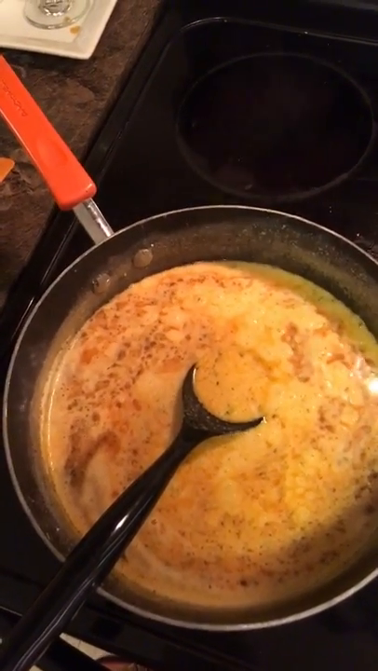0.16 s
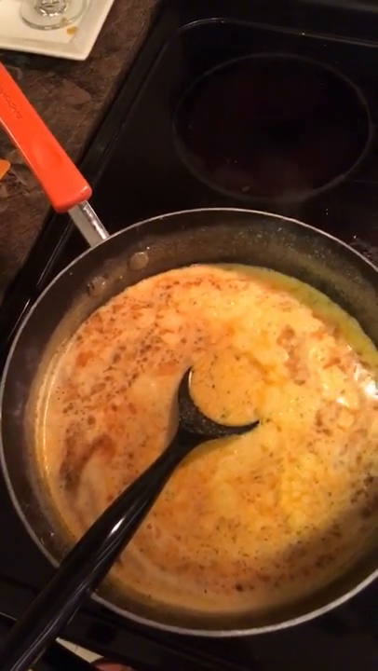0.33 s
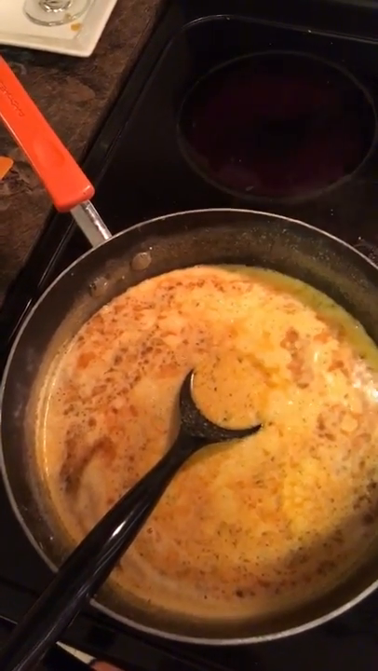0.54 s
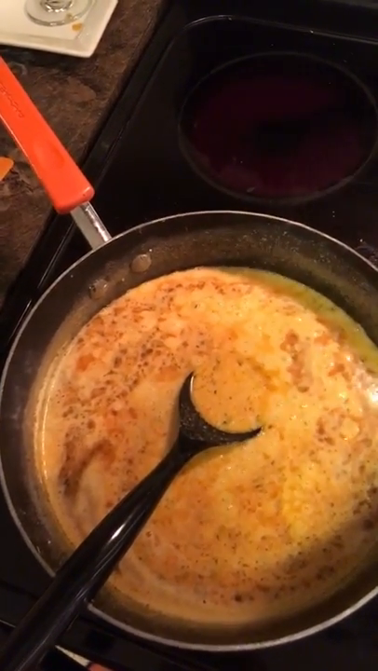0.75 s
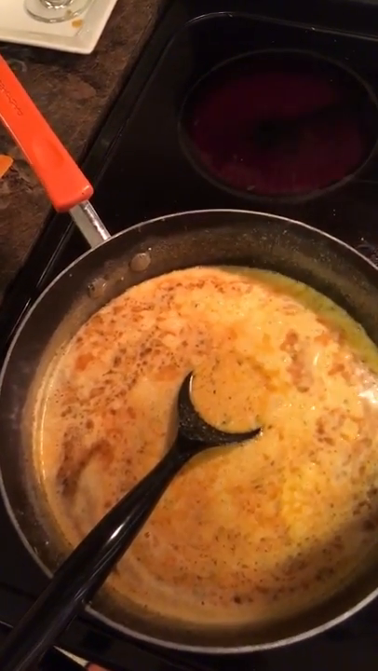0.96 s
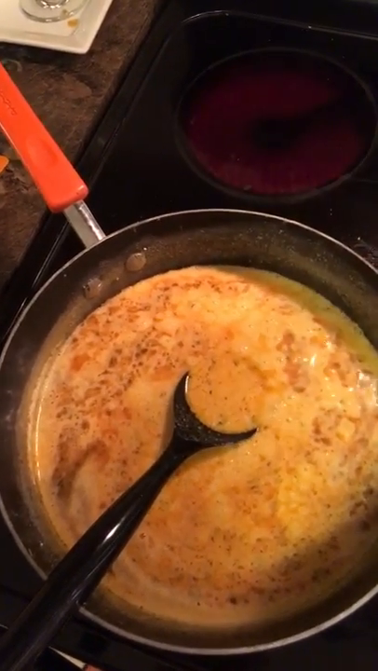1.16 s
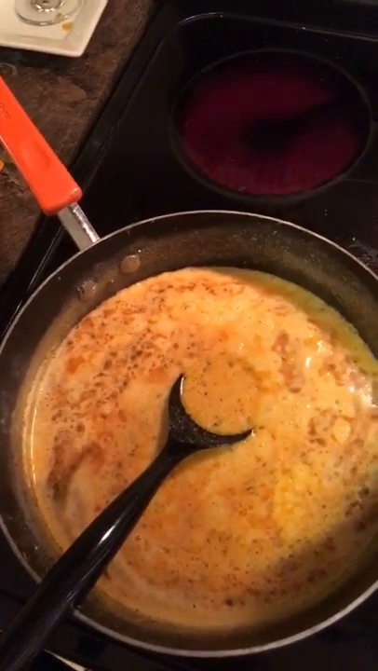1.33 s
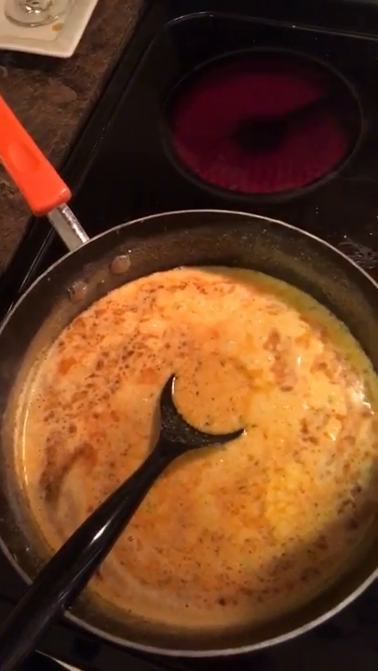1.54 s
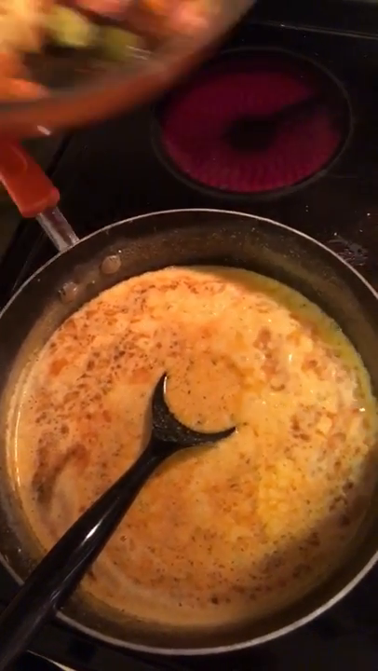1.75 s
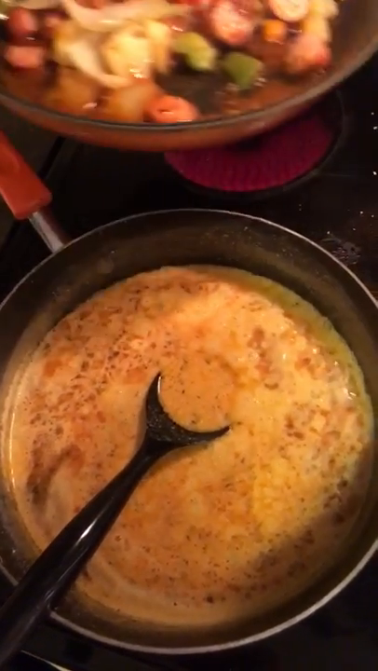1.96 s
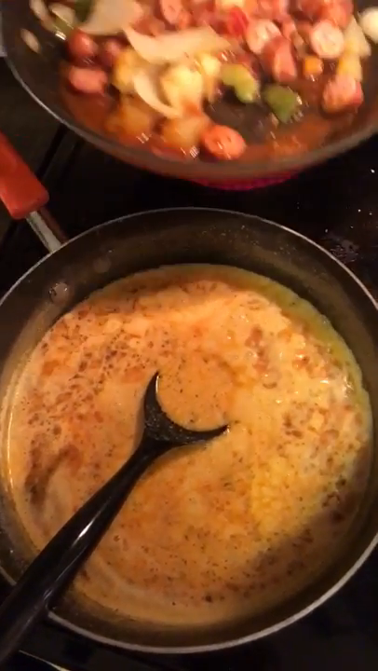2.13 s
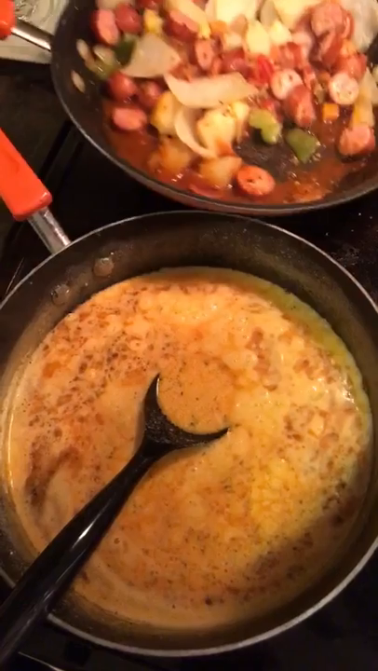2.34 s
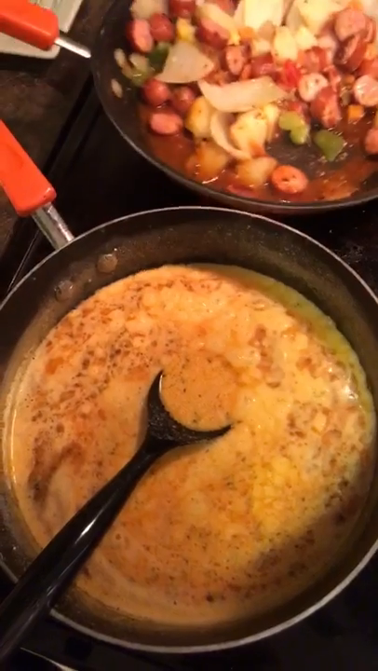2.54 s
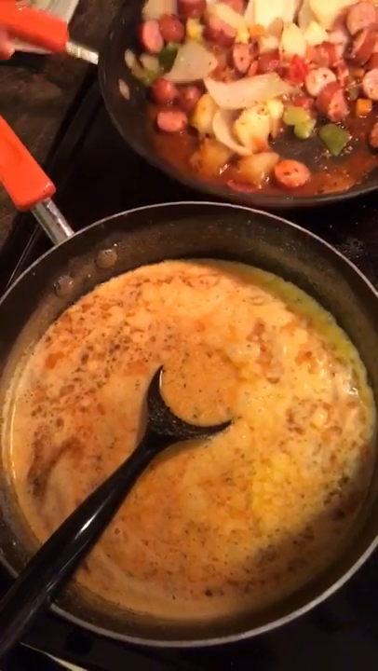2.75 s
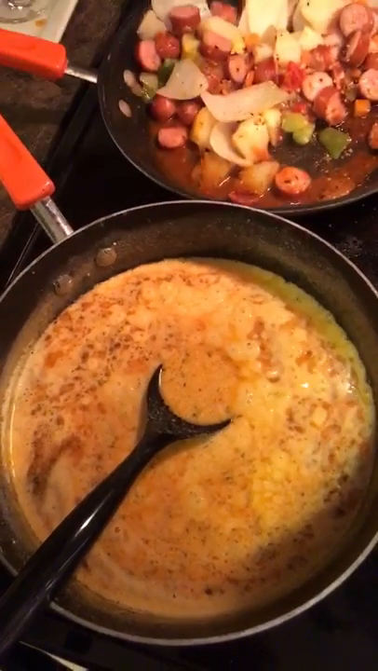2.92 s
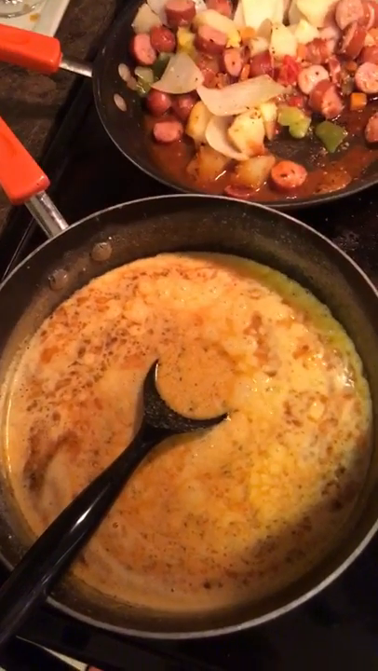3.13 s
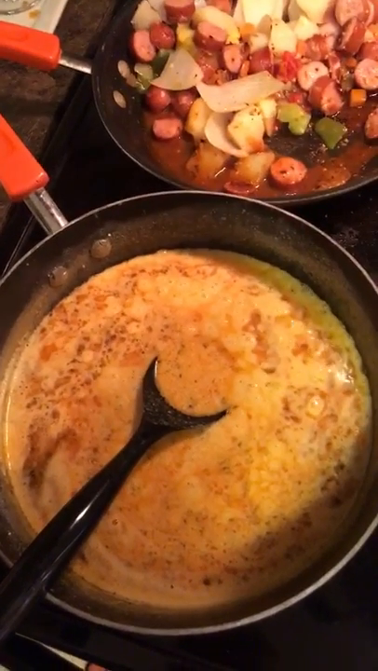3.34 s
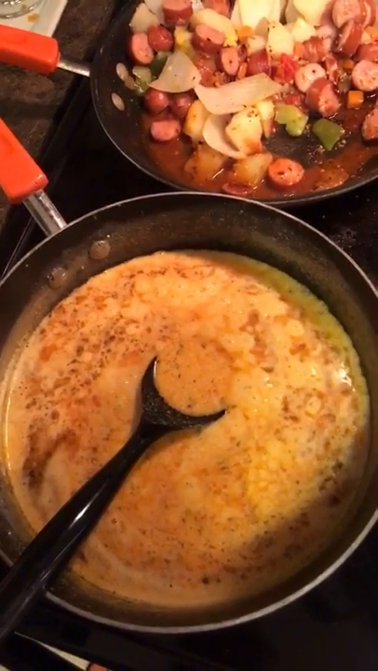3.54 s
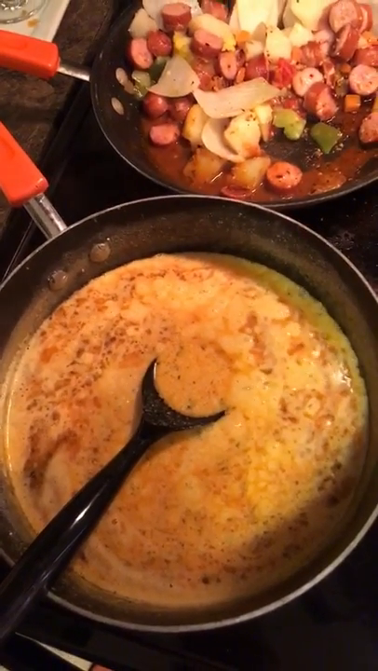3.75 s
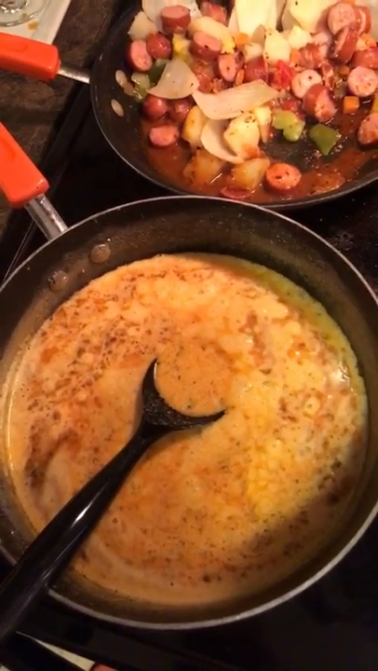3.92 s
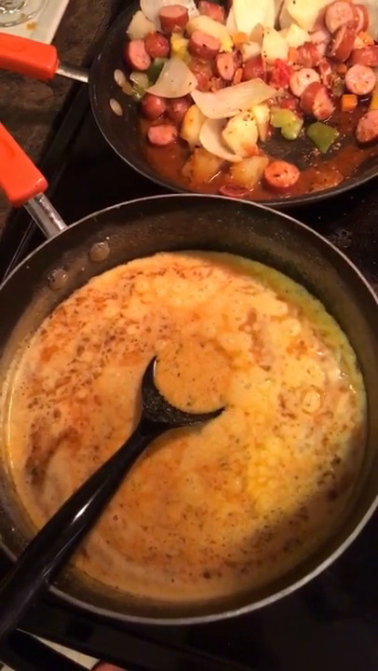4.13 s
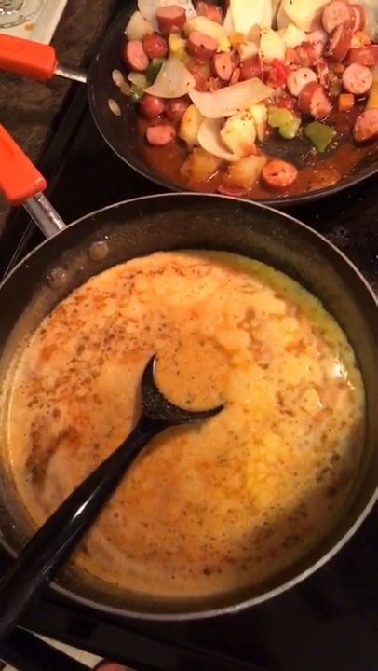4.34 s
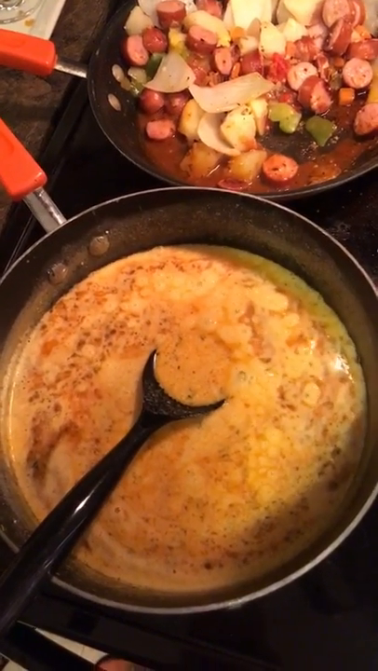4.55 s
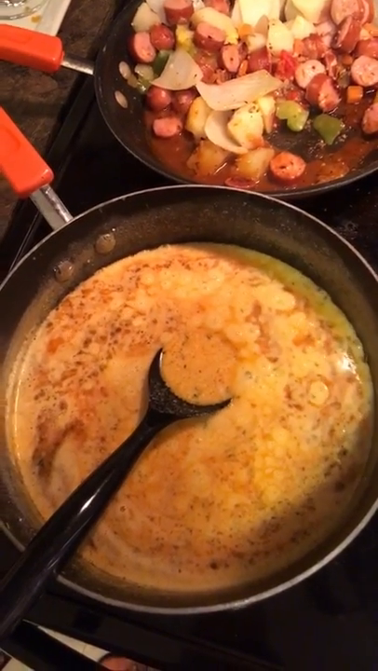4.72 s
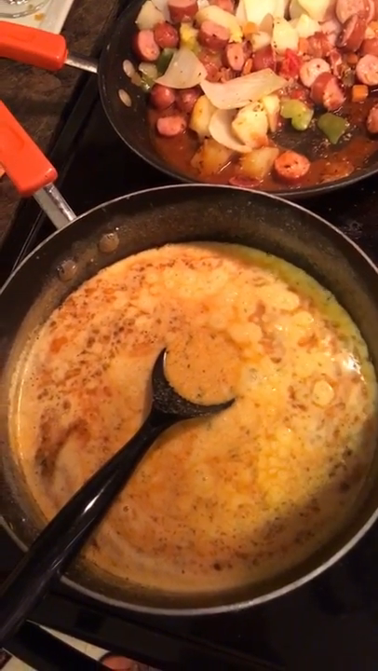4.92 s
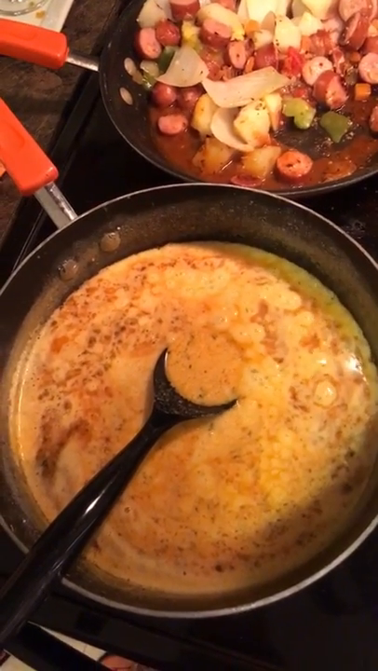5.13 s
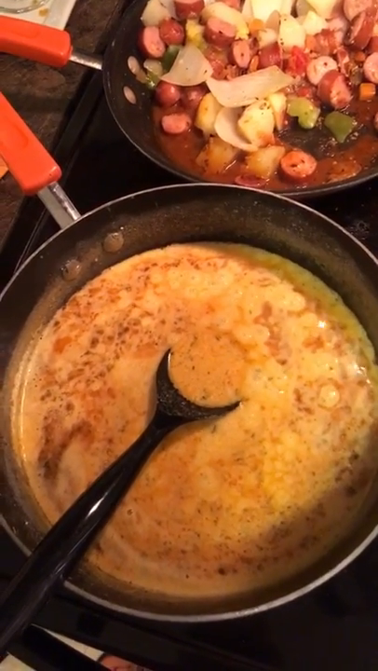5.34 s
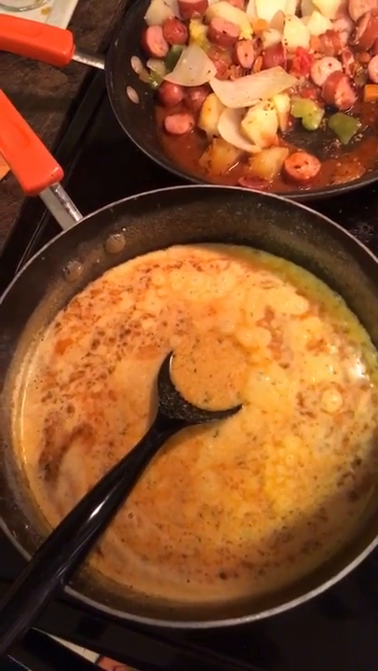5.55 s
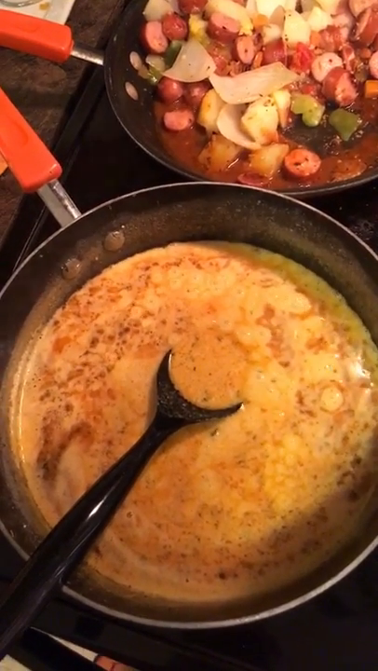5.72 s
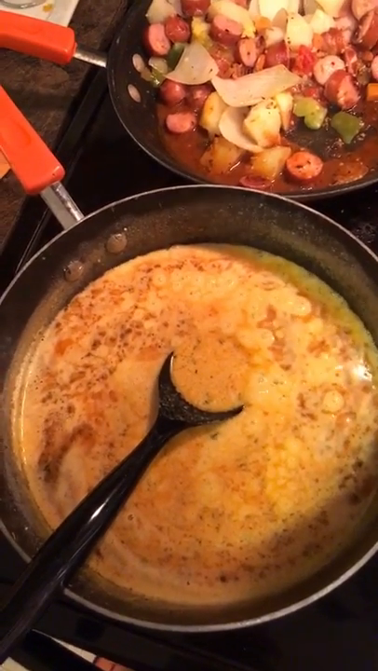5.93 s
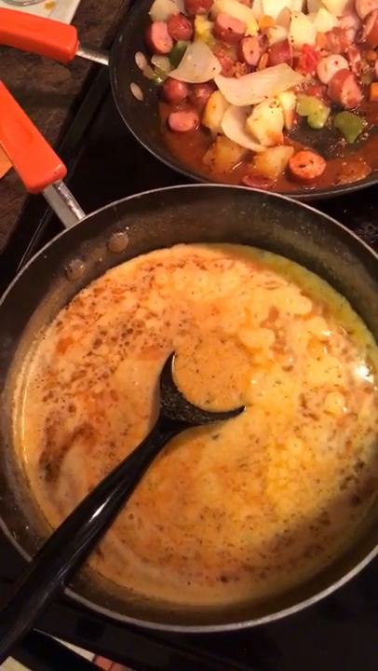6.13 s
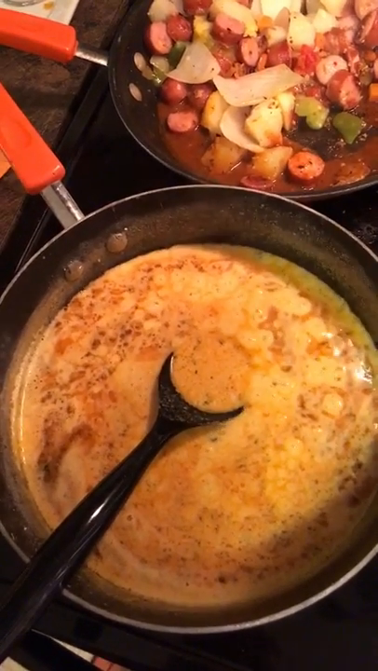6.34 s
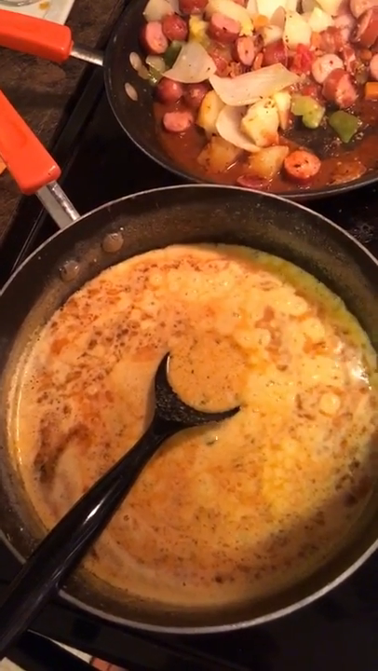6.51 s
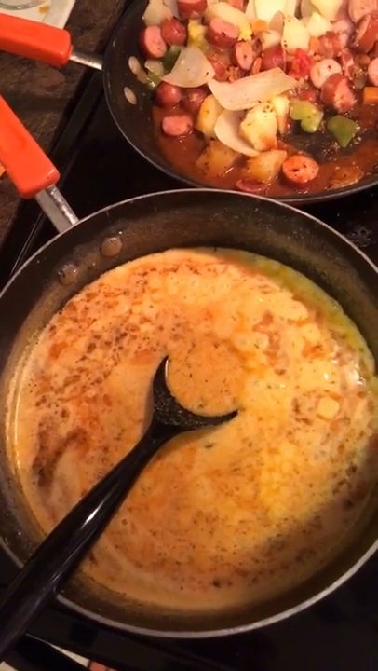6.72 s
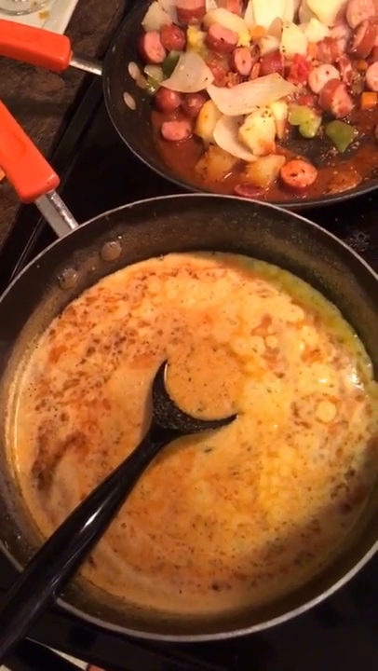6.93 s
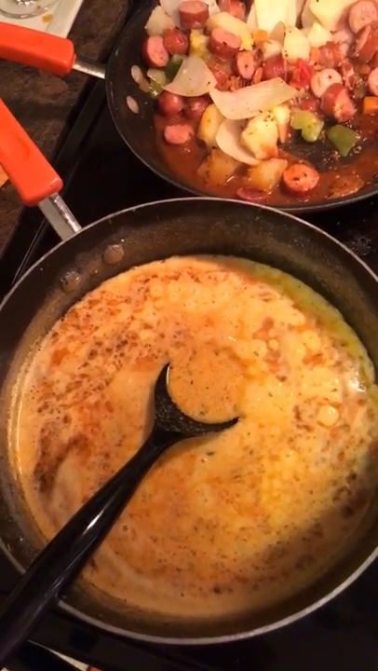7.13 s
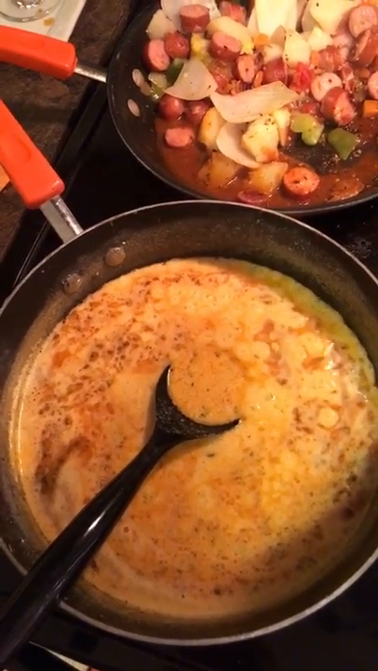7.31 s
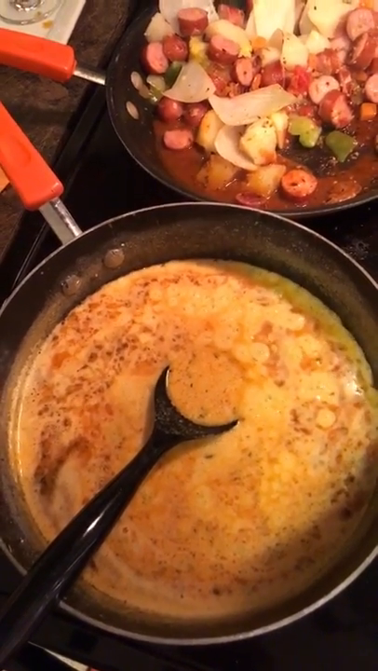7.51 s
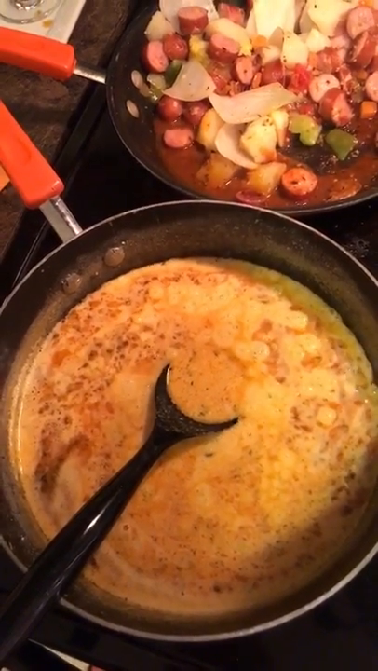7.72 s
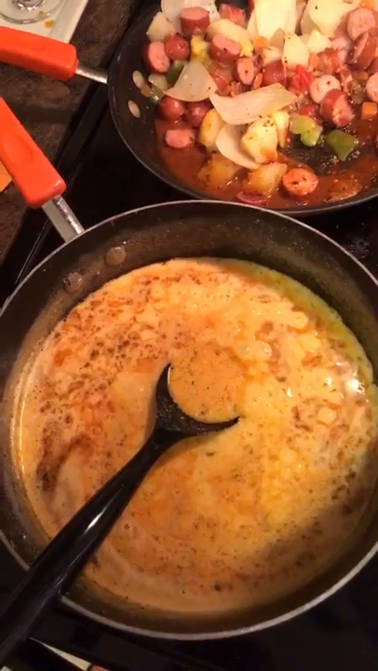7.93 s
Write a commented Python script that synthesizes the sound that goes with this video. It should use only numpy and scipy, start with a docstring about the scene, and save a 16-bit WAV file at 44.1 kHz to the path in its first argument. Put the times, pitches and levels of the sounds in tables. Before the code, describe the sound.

Close above a skillet, thick sauce plops and gurgles softly with light crackle and rare fat spits. A loud pan knock with a dull pot ring comes early, then a second pan lands on the stove in a cluster of hard clacks and thuds. More clatter follows, including a bright lid clink, before the simmer continues alone. Small kitchen, short echoes, low hiss and rumble, phone microphone.

```python
"""Thick sauce simmers in a skillet: collapsing steam bubbles plop as short damped oscillations.
Small collapses ring the pan as a gurgle, tiny ones crackle softly, and drops of fat spit.
Knocks of pans and tools are decaying bands of noise over a thud of the electric stove's hob.
A steel lid and a pot ring as sums of decaying modes; filtered noise gives the small kitchen's hiss
and rumble, and a decaying noise tail its echoes. A phone held just above the skillet listens."""
import sys
import numpy as np
from scipy import signal
from scipy.fft import rfft, irfft, next_fast_len
from scipy.io import wavfile
from scipy.ndimage import uniform_filter1d

SR = 44100
rng = np.random.default_rng(int(sys.argv[2]) if len(sys.argv) > 2 else 0)


def dump(signal):
    """Clip the signal to [-1, 1] and save it as 16-bit WAV at the path in sys.argv[1]."""
    limited = np.clip(np.atleast_2d(signal).T, -1, 1)
    pcm = np.round(limited * 32767).astype(np.int16)
    wavfile.write(sys.argv[1], SR, pcm)


N = 351477

# Steady kitchen noise. Each row: frequency in Hz, relative spectral level in dB per Hz.
KITCHEN_SPECTRUM = [(15, -39), (25, -2.5), (102, 0.5), (190, -2), (317, -4.5), (463, -13.5), (695, -10.5),
                    (887, -21), (1020, -14), (1230, -21), (2160, -18.5), (10400, -28), (11900, -29.5),
                    (14800, -30), (16000, -44)]
# Reverberation bands. Each row: centre in Hz, 60 dB decay time in s, relative level in dB.
ROOM_BANDS = [(197, 0.49, -.5), (655, 0.41, 1), (1810, 0.3, 2), (4940, 0.3, 0.5), (11500, 0.17, 4.5)]
# Free modes of a steel lid. Each row: frequency in Hz, relative level in dB, 60 dB decay time in s.
LID = [(1121, -10, .25), (1744, -5, .5), (2147, -11, .6), (2231, -4, .16), (3090, 0, .3), (3805, -10, .28),
       (3908, -20, .3), (4053, -5, .4), (4389, -13, .35), (5097, -14, .2), (5308, -7, .22), (5541, -8, .15),
       (6360, -16, .22), (6898, -9, .26), (6943, -7, .28), (7972, -10, .18), (9170, -3, .14),
       (11600, -21, .17)]
# Free modes of a heavier pot. Each row: frequency in Hz, relative level in dB, 60 dB decay time in s.
POT = [(775, -6, .17), (1117, -4, .25), (1180, -6, .2), (1468, -10, .2), (1781, -12, .25), (1902, -8, .2),
       (2155, -9, .16), (3090, -9, .22), (3126, 0, .24), (3808, -16, .2), (4070, -8, .3), (5108, -13, .18),
       (6944, -18, .14)]
# Blows that ring them. Each row: start in s, modes struck, level in dB,
# brightness in dB per octave about 3 kHz, rise time constant in s.
RINGS = [(.605, POT, -22, -5, 0.008), (4.593, LID, -19.5, 1, 0.00054), (7.907, LID, -51, 7.5, .003)]
# Knocks of pans and tools. Each row: start in s, crack level in dB, crack pitch in Hz, edge level in dB,
# edge pitch in Hz, rattle decay time in s (before the extra damping of each range), thud level in dB,
# thud pitch in Hz, thud decay time in s. Decay times are to -60 dB.
KNOCKS = [(.603, -4, 2130, -27, 4300, 0.11, -14, 196.4, 0.16),
          (1.2452, -35.5, 2510, -28.5, 3880, 0.25, -54, 129, .1),
          (2.3183, -13.5, 1260, -10.5, 3500, 0.03, -15, 168, .065),
          (2.4769, -35, 1190, -32, 3000, .044, -24, 122, .08),
          (2.487, -19.5, 756, -48, 2780, 0.091, -14.5, 165, 0.089),
          (2.5168, 0, 1970, -13.5, 3900, 0.026, -6, 184.6, 0.094),
          (2.8975, -14.5, 980, -23, 2950, 0.023, -10.5, 102, 0.098),
          (2.9231, -28, 1080, -20.5, 3750, 0.064, -12, 126, 0.063),
          (2.9459, -26, 885, -27, 3000, 0.038, -17.5, 235, 0.052),
          (3.536, -21, 1720, -13, 4600, 0.072, -33.5, 192, .1),
          (3.5622, -29, 850, -44, 3840, .06, -34, 102, .1),
          (3.6862, -3, 1500, .5, 6100, 0.03, -25.5, 212, 0.12),
          (4.5958, -7.5, 1810, -8.5, 4300, .038, -28.5, 258, .09),
          (4.7024, -23.5, 2260, -15, 6860, 0.14, -31.5, 134, 0.22),
          (4.8439, -14.5, 1534, -19.5, 4350, 0.063, -27.5, 128, 0.1),
          (4.9026, -8.5, 1570, -19.5, 3700, 0.071, -22.5, 221, 0.13)]
# Low modes of the hob in a thud. Each row: ratio to the thud pitch, linear gain.
HOB_MODES = [(1.009, 1), (0.717, 0.87), (0.42, 0.1), (1.6, 0.47)]
# Drops of fat spitting. Each row: start in s, peak level in dB, pitch in Hz.
SPITS = [(1.1209, -39, 6760), (1.293, -34, 6320), (3.3512, -22, 5600), (6.598, -32, 11600),
         (7.3771, -34, 6970), (7.7834, -26, 11100)]
# Base level of the surface crackle. Each row: time in s, level in dB.
CRACKLE_LEVEL = [(0, -57.5), (.45, -59), (2.0, -57), (2.2, -60), (3.25, -60.5), (3.37, -50), (3.5, -58.5),
                 (5.6, -60), (5.8, -53.5), (6.0, -59), (6.7, -57.5), (6.9, -56.5), (7.95, -56)]
# Pan modes woken by each small collapse. Each row: frequency in Hz, spread of pitch from 0 to 1,
# relative level in dB, length in cycles.
PAN_MODES = [(115, 0, -6.5, 2.03), (329.4, 0.16, 5, 2.85), (715, 0.06, -4, 6), (1115, 0.12, -5.5, 6.9)]
# Modes of tiny surface bubbles. Each row: frequency in Hz, spread of pitch from 0 to 1,
# relative level in dB, length in cycles.
CRACKLE_MODES = [(1866, 0.32, 3.5, 4.8), (3700, 0.23, 8.5, 2.24), (7880, 0.42, 7.5, 2.45)]
# The clearest plops. Each row: time of the envelope's peak in s, peak level in dB, pitch in Hz.
PLOPS = [(.031, -29, 318), (.031, -22, 745), (.038, -30.5, 2330), (.08, -35, 326), (.107, -33, 338),
         (.117, -36, 770), (0.218, -33.5, 307), (0.221, -35, 2300), (.332, -32.5, 2750), (.334, -33.5, 330),
         (.484, -37, 325), (.586, -28.5, 260), (0.79, -30.5, 350), (.916, -31, 318), (1.032, -34, 303),
         (1.128, -34, 2800), (1.162, -30, 323), (1.179, -33.5, 2850), (1.248, -33.5, 2250),
         (1.338, -33, 312), (1.48, -25.5, 335), (1.631, -34, 345), (1.685, -32, 700), (1.747, -34.5, 390),
         (1.754, -33, 705), (1.862, -34.5, 1780), (1.89, -31, 2600), (1.996, -29.5, 2610),
         (2.032, -25.5, 322), (2.112, -35.5, 700), (2.404, -38, 1240), (2.645, -34, 1700), (2.66, -33, 338),
         (2.719, -33, 674), (2.758, -36, 1960), (2.836, -33, 309), (3.031, -34, 730), (3.069, -35, 1140),
         (3.069, -31.5, 385), (3.215, -30.5, 685), (3.305, -31.5, 654), (3.305, -29.5, 325),
         (3.353, -30, 3700), (3.406, -36, 3060), (3.426, -33, 352), (3.337, -34, 2880), (3.568, -32, 309),
         (3.58, -32, 890), (3.904, -36, 2250), (3.966, -32.5, 1014), (4.049, -32, 2200), (4.094, -32, 296),
         (4.113, -32, 327), (4.129, -32, 706), (4.216, -36, 2620), (4.252, -35, 704), (4.254, -26.5, 336),
         (4.282, -31.5, 725), (4.417, -32, 355), (4.563, -31, 300), (4.685, -31, 340), (4.769, -36, 327),
         (5.101, -30.5, 316), (5.117, -31.5, 640), (5.136, -30.5, 694), (5.249, -33, 686),
         (5.336, -35.5, 1700), (5.338, -34.5, 690), (5.571, -34, 2210), (5.619, -31.5, 352),
         (5.798, -34, 595), (5.816, -28, 310), (5.821, -36, 750), (5.834, -34, 1460), (5.837, -24.5, 326),
         (5.899, -31, 333), (6.075, -37, 700), (6.079, -33.5, 350), (6.184, -34.5, 340), (6.316, -32, 667),
         (6.319, -25.5, 327), (6.444, -30.5, 337), (6.463, -26, 697), (6.59, -36.5, 310),
         (6.644, -31.5, 3900), (6.656, -32.5, 312), (6.683, -29, 316), (6.699, -34.5, 2370),
         (6.725, -28.5, 3960), (6.762, -34.5, 2510), (6.804, -35, 323), (6.911, -35.5, 717),
         (6.997, -30.5, 304), (7.023, -31.5, 336), (7.117, -27.5, 355), (7.198, -31.5, 310),
         (7.359, -35, 3860), (7.43, -33, 337), (7.481, -35, 720), (7.499, -33, 1020), (7.597, -30.5, 312),
         (7.628, -35.5, 960), (7.749, -29.5, 322), (7.825, -31.5, 306), (7.833, -32, 688),
         (7.845, -31.5, 740)]

KITCHEN_DB = -45  # rms level
ROOM_DB, ROOM_GAP_S = -10, 0.00067  # level of the tail; time in which it builds up
WOOD_DB, TICK_DB = -4, -8.5  # the wood range follows the crack, the tick follows the edge
THUD_LAG_S = 0.00666
GURGLE_DB = -51.5
CLUSTER_DB, CLUSTER_S = 4, 0.029  # small bubbles grow up to this much louder, this close to a clear plop
CRACKLE_LAYERS = 6  # number of crackle layers, each smeared by its own short noise
PLOP_S, PLOP_HZ, SHORTENS = 0.01099, 328.4, 0.865  # length at this pitch; shortens as this power of pitch
TOP_HZ = 15700  # upper limit of the sound


def undb(db):
    """Amplitude ratio is ten to the power of level over twenty."""
    return 10 ** (np.asarray(db) / 20)


def add(out, x, start_s):
    """Superposition: a short sound adds to the mixture at its start time."""
    i = max(int(start_s * SR), 0)
    out[i:i + len(x)] += x[:N - i]


def band(x, lo_hz, hi_hz):
    """Causal band-pass filtering keeps the energy between two frequencies."""
    edges = [lo_hz, min(hi_hz, TOP_HZ)]
    return signal.sosfilt(signal.butter(2, edges, "band", fs=SR, output="sos"), x)


def fall(t, t60):
    """Linear damping gives an exponential decay, 60 dB down after t60 seconds."""
    return np.exp(-np.log(1000) * t / t60)


def walk(rate):
    """Random modulation: normal draws, one every 1 / rate seconds, joined by straight ramps."""
    k = int(SR / rate)
    steps = np.repeat(rng.standard_normal(N // k + 1), k)
    return uniform_filter1d(steps, k)[:N]


def kitchen():
    """Spectral shaping of noise: half-octave slices of hiss and rumble swell together, flicker alone."""
    size = next_fast_len(N, real=True)
    hz = np.fft.rfftfreq(size, 1 / SR) + 1  # the offset avoids log(0)
    table_hz, table_db = np.transpose(KITCHEN_SPECTRUM)
    colour = undb(np.interp(np.log(hz), np.log(table_hz), table_db))
    noise = rfft(rng.standard_normal(size)) * colour
    swell = walk(2.5)
    out = 0
    half_octaves = 2 * np.log2(hz / 25)
    for k in range(20):
        window = np.cos(np.pi / 2 * np.clip(half_octaves - k, -1, 1)) ** 2
        noise_slice = irfft(noise * window, size)[:N]
        out = out + noise_slice * undb(.7 * swell + 1.3 * walk(12))
    return out * undb(KITCHEN_DB) / out.std()


def room(x):
    """Reverberation as convolution with decaying noise, its treble dying sooner than its bass."""
    t = np.arange(int(.45 * SR)) / SR
    width = 1.7  # frequency ratio from band centre to band edge
    tail = np.zeros(len(t))
    for hz, t60, db in ROOM_BANDS:
        noise = band(rng.standard_normal(len(t)), hz / width, hz * width)
        tail += undb(db) * noise * fall(t, t60)
    tail *= 1 - np.exp(-(t / ROOM_GAP_S) ** 2)
    unit_tail = tail / np.sqrt(np.sum(tail ** 2))
    return signal.fftconvolve(x, unit_tail)[:N]


def lid_and_pot():
    """Modal vibration: free modes swell in over a short rise, then decay exponentially."""
    out, t = np.zeros(N), np.arange(int(.5 * SR)) / SR
    for start_s, modes, blow_db, tilt_db, rise_s in RINGS:
        for hz, db, t60 in modes:
            gain = undb(blow_db + db + tilt_db * np.log2(hz / 3000))
            envelope = (1 - np.exp(-t / rise_s)) * fall(t, t60)
            add(out, gain * envelope * np.sin(2 * np.pi * hz * t), start_s)
    return out


def knocks():
    """Impact: rattling noise in four ranges, with damped low modes of the hob in a late thud."""
    out, t = np.zeros(N), np.arange(int(.3 * SR)) / SR
    for start_s, crack_db, crack_hz, edge_db, edge_hz, t60, thud_db, thud_hz, thud_t60 in KNOCKS:
        # a quieter, longer noise tail follows each knock
        decay = fall(t, t60) + undb(-15.5) * fall(t, 0.31)
        rattle = rng.standard_normal(len(t)) * decay * (1 - np.exp(-t / 0.00038))
        ranges = [(crack_db, 0.628 * crack_hz, 1.28 * crack_hz),  # crack
                  (crack_db + WOOD_DB, 420, 1400),  # wood
                  (edge_db, 0.67 * edge_hz, 1.53 * edge_hz),  # edge
                  (edge_db + TICK_DB, 8000, 14000)]  # tick
        for db, lo_hz, hi_hz in ranges:
            part = band(rattle * fall(t, 250 / lo_hz), lo_hz, hi_hz)  # treble dies sooner
            add(out, undb(db) * part / np.abs(part).max(), start_s)
        bloom = (1 - np.exp(-t / 0.001)) * fall(t, thud_t60)
        modes = sum(gain * np.sin(2 * np.pi * ratio * thud_hz * t) for ratio, gain in HOB_MODES)
        add(out, undb(thud_db) * bloom * modes, start_s + THUD_LAG_S)
    return out


def bubble(hz, length_s, phase):
    """Damped oscillation under a hump u exp(1 - u); returns the sound and its time to peak."""
    rise_s = length_s / 2.45  # the hump is 2.45 rises wide at half height
    u = np.arange(int(8 * rise_s * SR) + 2) / SR / rise_s
    envelope = u * np.exp(1 - u)
    return envelope * np.sin(2 * np.pi * (hz * rise_s * u + phase)), rise_s


def shower(rate, modes, level_db, scatter_db, own_db):
    """Random excitation: bubbles at chance moments wake all modes, each by its own amount."""
    out = np.zeros(N)
    for when, size, *draw in rng.random((int(rate * N / SR), 2 + 3 * len(modes))):
        size_db = level_db[int(when * N)] - scatter_db * np.log(size + .05)  # many small, few large
        for (hz, spread, db, cycles), (pitch, own, phase) in zip(modes, np.reshape(draw, (-1, 3))):
            mode_hz = hz * np.exp(spread * (2 * pitch - 1))
            gain = undb(size_db + db + own_db * (2 * own - 1))
            add(out, gain * bubble(mode_hz, cycles / mode_hz, phase)[0], when * N / SR)
    return out


def crowding():
    """Clustering in time: 0 in a lull, towards 1 near a clear plop."""
    t = np.arange(0, N / SR + .02, .01)
    distance_s = t[:, None] - np.array(PLOPS)[:, 0]
    near = np.exp(-(distance_s / CLUSTER_S) ** 2).sum(axis=1)
    return np.interp(np.arange(N) / SR, t, np.tanh(near))


def gurgle():
    """Forced ringing of the pan: small collapses wake its modes, louder near each clear plop."""
    level_db = GURGLE_DB + CLUSTER_DB * crowding() + 1.04 * np.clip(walk(10), -2, 1)
    return shower(80, PAN_MODES, level_db, 3.1, 6.0)


def crackle():
    """Smearing by convolution: short decaying noise softens the ticks of tiny surface bubbles."""
    out, t = np.zeros(N), np.arange(int(.06 * SR)) / SR
    level_db = np.interp(np.arange(N) / SR, *np.transpose(CRACKLE_LEVEL))
    for _ in range(CRACKLE_LAYERS):
        ticks = shower(50, CRACKLE_MODES, level_db, 2.3, 6.2)
        blur = rng.standard_normal(len(t)) * fall(t, 0.019)
        out += signal.fftconvolve(ticks, blur / np.sqrt(np.sum(blur ** 2)))[:N]
    return out


def spitting_fat():
    """Brief pulse: each drop of fat is a very short damped oscillation of high pitch."""
    out = np.zeros(N)
    for start_s, db, hz in SPITS:
        add(out, undb(db) * bubble(hz, 0.00019, 0.3)[0], start_s)
    return out


def plops():
    """Bubble collapse: a damped tone, a lower push on the pan floor and a wet splash of noise."""
    out, t = np.zeros(N), np.arange(int(.06 * SR)) / SR
    for (peak_s, db, hz), phase in zip(PLOPS, rng.random(len(PLOPS))):
        length_s = PLOP_S * (PLOP_HZ / hz) ** SHORTENS
        tone, rise_s = bubble(hz, length_s, phase)
        start_s = peak_s - rise_s
        add(out, undb(db) * tone, start_s)
        push = bubble(0.384 * hz, 0.99 * length_s, phase)[0]
        add(out, undb(db - 9.5) * push, start_s)
        splash = band(rng.standard_normal(len(t)) * fall(t, 0.068), 0.54 * hz, 2.0 * hz)
        add(out, undb(db - 5.5) * splash / np.abs(splash).max(), start_s)
    return out


def sauce():
    """Superposition of the gurgle, the crackle, the clear plops and the spitting fat."""
    return gurgle() + crackle() + plops() + spitting_fat()


def scene():
    """Direct and reverberant sound add, together with the steady background."""
    near, far = sauce(), knocks()
    # the skillet sits close under the microphone, so the walls add less to it
    echoes = undb(ROOM_DB) * room(far + undb(-2.5) * near)
    return (near + far + lid_and_pot() + echoes + kitchen())[None]


def record(dry):
    """Limited bandwidth and saturation: the phone drops deep bass, rounds peaks and cuts the top."""
    x = signal.sosfilt(signal.butter(3, 50., "high", fs=SR, output="sos"), dry)
    rounded = .88 * np.tanh(x / .88)
    return signal.sosfilt(signal.ellip(8, .2, 60, TOP_HZ, fs=SR, output="sos"), rounded)


dry = scene()
out = record(dry)
dump(out)
```